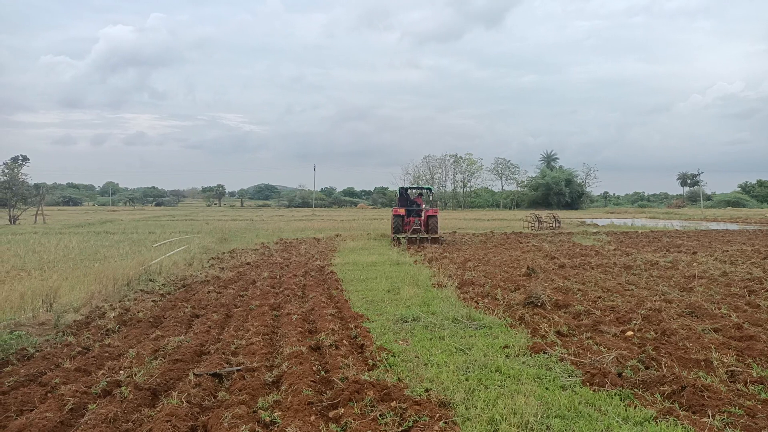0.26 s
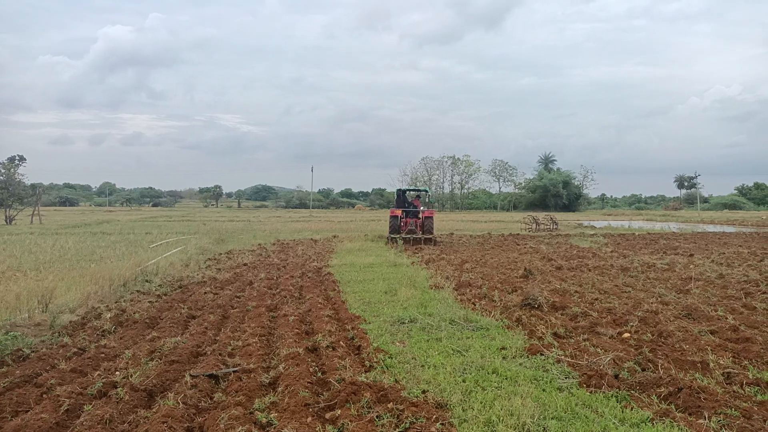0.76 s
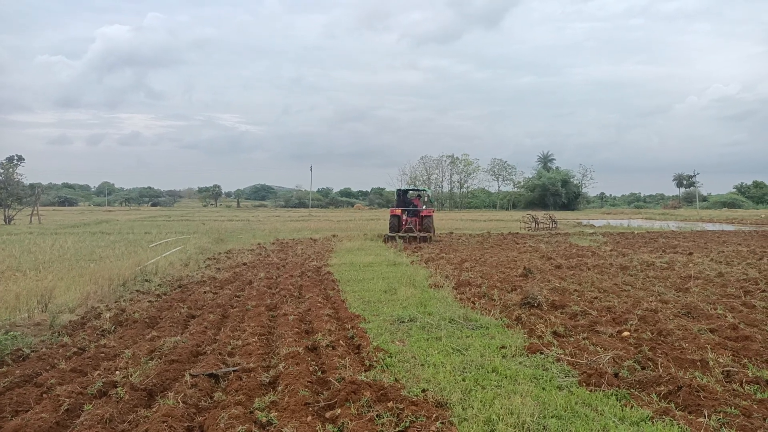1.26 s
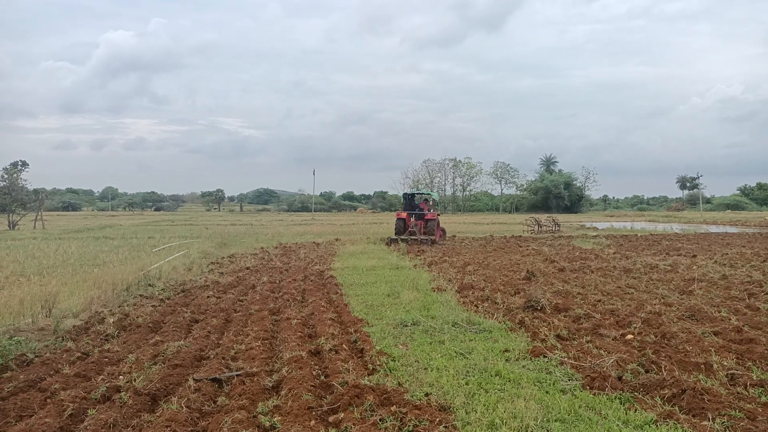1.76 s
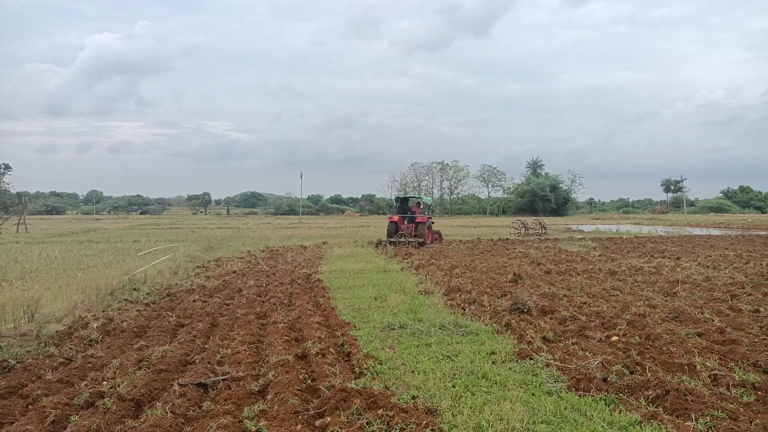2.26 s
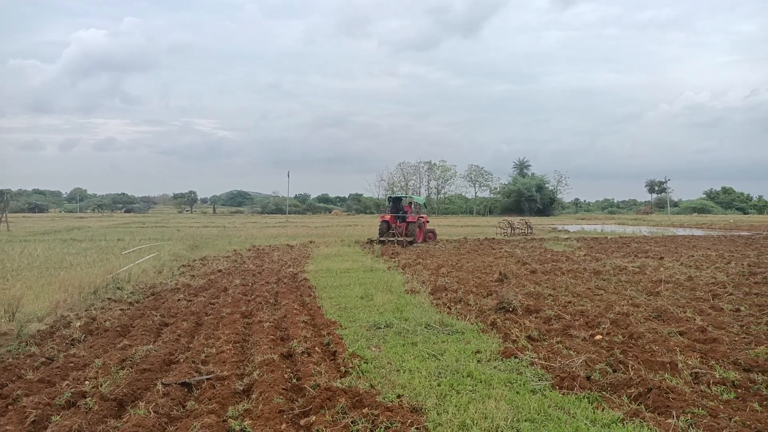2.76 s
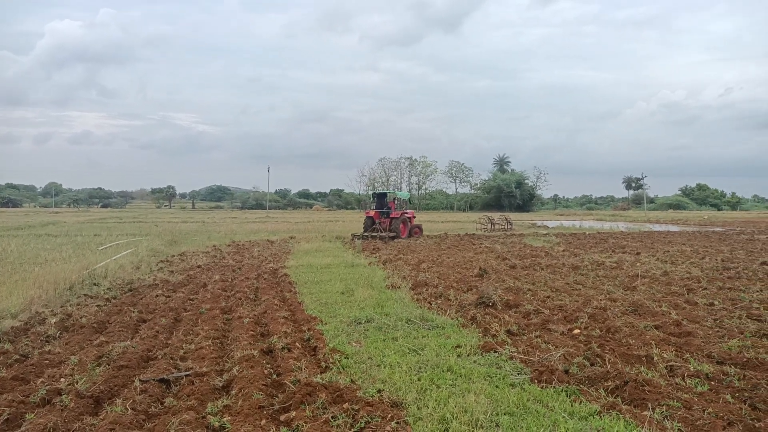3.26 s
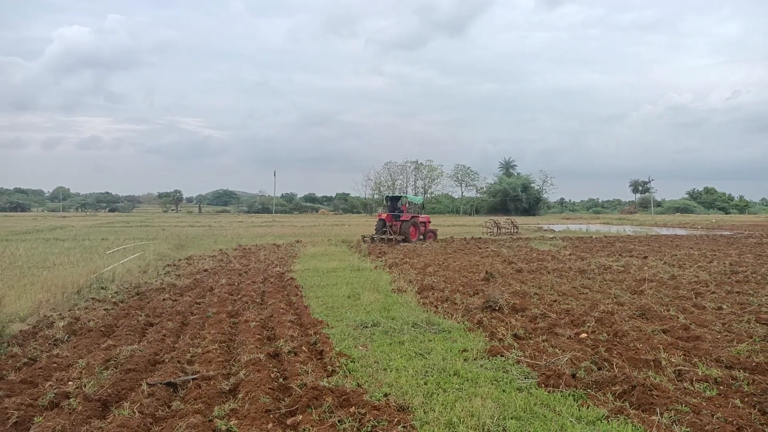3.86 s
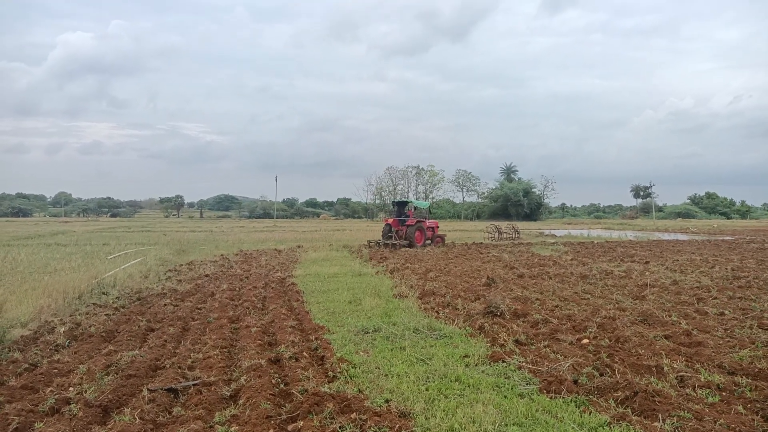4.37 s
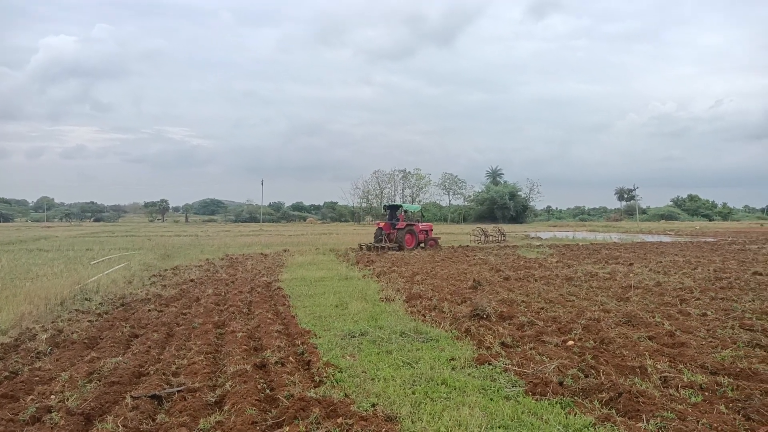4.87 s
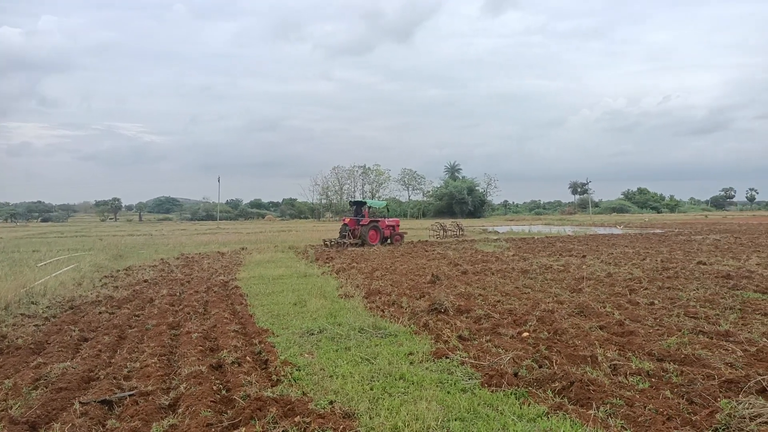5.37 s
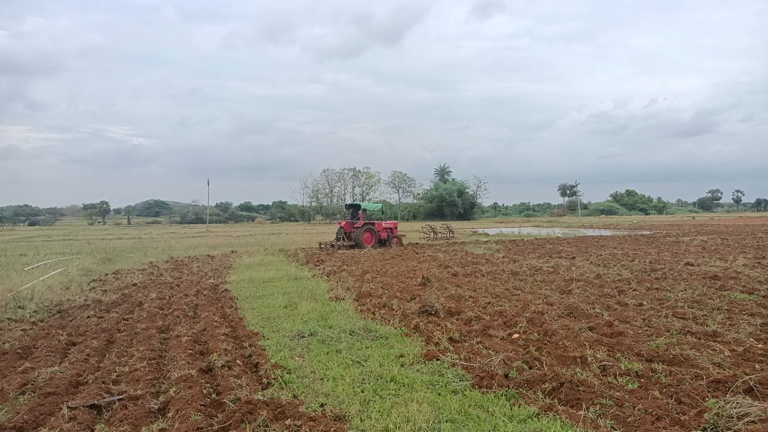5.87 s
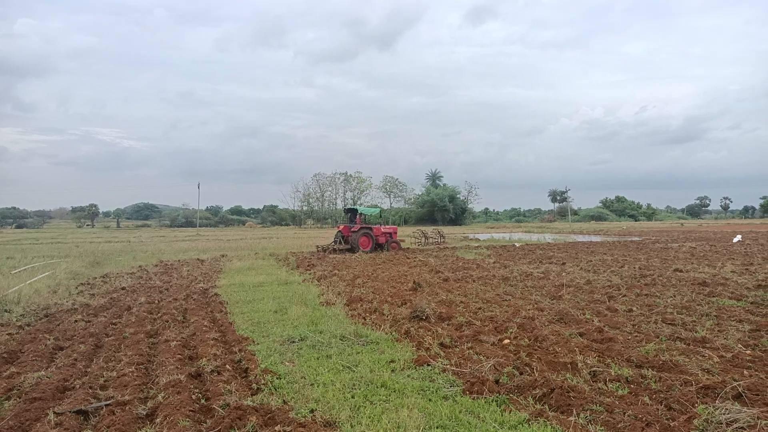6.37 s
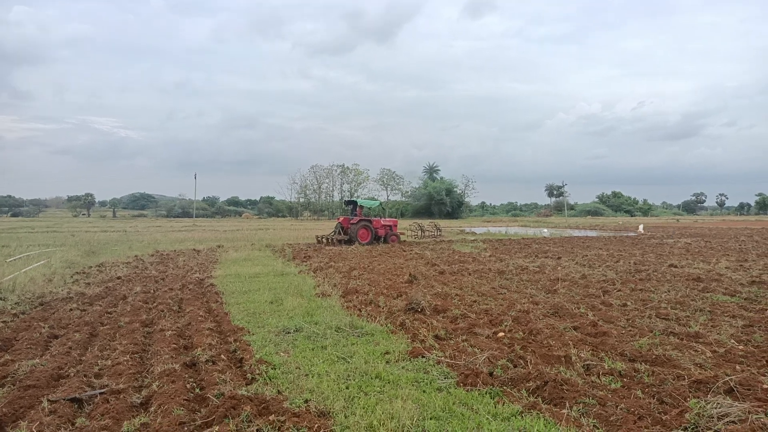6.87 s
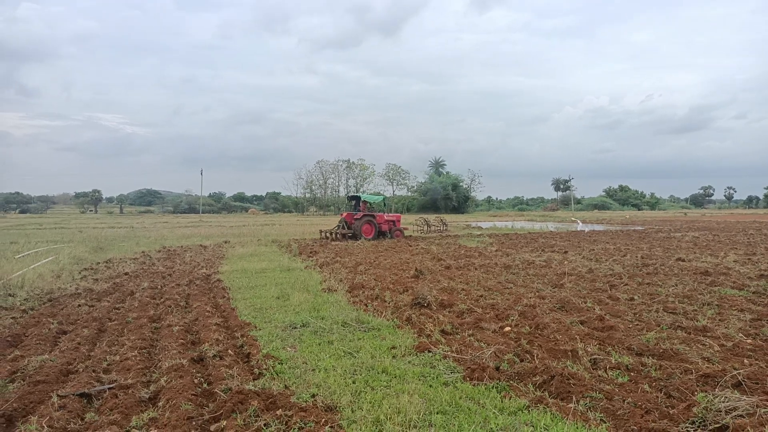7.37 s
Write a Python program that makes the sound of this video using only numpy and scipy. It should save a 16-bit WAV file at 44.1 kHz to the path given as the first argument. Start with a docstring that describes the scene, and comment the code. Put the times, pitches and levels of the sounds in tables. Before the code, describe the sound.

A diesel tractor runs, then slows to an uneven chug as wind gusts buffet the microphone, with faint birds behind.

```python
"""Tractor working a windy field

A diesel tractor drags a squeaking cultivator, then slows to a chug for the turn. Each firing is a
thump in the silencer, a bark and rasp in the exhaust stack and a spit of hiss. Gusts buffet the two
ports of the microphone, while birds chip and an insect buzzes from the grass."""
import sys
import numpy as np
from scipy import signal
from scipy.fft import rfft, irfft
from scipy.io import wavfile
from scipy.ndimage import map_coordinates

SR = 44100
rng = np.random.default_rng(int(sys.argv[2]) if len(sys.argv) > 2 else 0)


def master_out(mix):
    """Clip the mix to full scale and print it as 16-bit PCM to the path in sys.argv[1]."""
    frames = np.transpose(np.atleast_2d(mix))
    ceiling = np.clip(frames, -1, 1)
    pcm = np.round(ceiling * 32767).astype(np.int16)
    wavfile.write(sys.argv[1], SR, pcm)


N = 335601
T = np.arange(N) / SR
HZ = np.fft.rfftfreq(N, 1 / SR)

# how alike the two microphone ports sound: (frequency [Hz], likeness [capped at 1])
PORT_LIKENESS = [(60, 0.55), (300, 0.8), (600, 1), (1200, 0.86), (2200, .65), (4200, 1.6), (5600, 0.5),
                 (6600, 0.05), (9300, 0.9), (14000, 0.8)]
# phase between the ports: (frequency [Hz], left lead [rad])
PORT_PHASE = [(100, 0.39), (1500, 0.16), (2200, -1.02), (3100, -1), (4200, -1), (5800, -0.2), (7500, -3),
              (9000, -1.5), (10500, -1), (15000, -0.5)]
# balance of the ports: (frequency [Hz], left minus right [dB])
PORT_BALANCE = [(100, 1.5), (750, 0), (1000, 2), (1280, -2), (1550, 4), (1900, -0.5), (2800, 1),
                (3700, -3.5), (5500, -2.5), (7400, 6), (9500, -9), (11000, -9), (13000, -4)]
# the tractor's bearing: (time [s], left port delay [microseconds])
LEFT_DELAY = [(0, 47), (3.4, 33), (5.8, 3.5), (7.61, -12)]
# hush of the field: (frequency [Hz], relative level [dB])
FIELD_SPECTRUM = [(20, -27), (70, 5), (150, -3.5), (300, -26.5), (600, -16), (1300, -18), (3200, -20.5),
                  (5500, -35.5), (7000, -38.5), (9300, -40.5), (12000, -57), (16000, -54)]
# the nearest birds: (time [s], pitch [Hz], length [s], level [dB])
BIRD_CHIPS = [(3.85, 4050, .015, -53), (4.1, 4670, .01, -51), (5.427, 4250, .006, -37),
              (5.805, 4500, .014, -46), (5.874, 3950, .005, -43), (6.292, 3450, .005, -43),
              (6.382, 3800, .005, -44), (7.161, 3480, .005, -46), (7.396, 3460, .006, -46)]
# ringing partials of the cultivator: (time [s], pitch [Hz], length [s], level [dB])
SQUEAK_PARTIALS = [(.025, 9500, 0.02, -62.5), (.778, 9000, .022, -65), (3.597, 2770, 0.013, -46),
                   (3.6, 4560, 0.045, -62), (3.6, 5870, 0.027, -58), (3.598, 7420, 0.022, -69),
                   (3.965, 6800, 0.032, -66), (3.97, 9160, 0.042, -65)]
# wind on the microphone: (frequency [Hz], relative level [dB])
BUFFET_SPECTRUM = [(15, -50), (35, -27), (80, 2), (150, 0.5), (250, -3.5), (420, -11.5), (600, -27.5),
                   (800, -33), (2000, -59), (5000, -85)]
# hard gusts: (time [s], relative peak [dB], left minus right [dB], length [s])
HARD_GUSTS = [(0.679, -21, 7, 0.018), (0.799, -22, -13, 0.02), (0.888, -18, -17, 0.016),
              (1.112, -11.5, -20, 0.014), (2.723, -17.5, -30, 0.011), (2.803, -11.5, -27, 0.012),
              (2.938, -8.5, 8, 0.02), (3.057, -9.5, 7.5, 0.027), (3.135, -17.5, 25, 0.014),
              (3.203, -4, 31.5, 0.015), (3.222, -6.5, 26, 0.014), (3.282, -13, -6.0, 0.021),
              (3.322, -6.5, 17, 0.011), (3.403, -5, 26, 0.014), (3.695, -10, 43, 0.018),
              (3.876, -19, 22.5, 0.024), (4.182, -18.5, 19, 0.02), (5.13, -17.5, 30, 0.02),
              (5.241, -27, 21.0, 0.024), (7.255, -31.5, 20, 0.022), (7.53, -26.5, 26, 0.024),
              (7.563, -29, 14, 0.024)]
# spells of small eddies: (start [s], end [s], relative level [dB], left minus right [dB])
WINDY_SPELLS = [(.8, .92, -29.5, -7), (2.701, 3.15, -25.5, 3), (3.148, 3.48, -21.5, 17.5),
                (3.573, 3.68, -23.5, 11), (3.976, 4.22, -25, 24)]
# engine speed: (time [s], firing rate [Hz])
FIRING_RATE = [(0.0, 32.23), (0.2, 30.19), (0.39, 34.89), (0.66, 29.83), (1.09, 33.72), (1.41, 31.85),
               (1.66, 33.37), (1.98, 31.52), (2.94, 28.8), (3.33, 26.06), (3.73, 15.12), (4.17, 19.16),
               (5.26, 13.57), (5.99, 19.08), (6.35, 16.07), (6.54, 16.52), (6.79, 26.15), (7.32, 17.88),
               (7.61, 23.98)]
# the driver eases off the pedal: (time [s], length [s], depth [0-1])
PEDAL_LIFTS = [(0.078, 0.078, 0.53), (0.544, 0.12, 0.55), (6.797, 0.36, 0.8), (7.187, 0.22, 0.46),
               (7.576, .1, 1)]
# exhaust hiss, growing as the tractor comes side-on: (time [s], relative level [dB])
HISS_LEVEL = [(0, -75), (1.9, -72), (2.4, -63), (3.3, -64.5), (3.8, -70), (4.4, -69), (5.1, -66),
              (6.0, -56), (6.35, -63), (6.7, -59.5), (7.61, -68)]
# boom of the silencer: (frequency [Hz], width [Hz], gain [dB])
SILENCER_MODES = [(87, 36.9, 1), (99.5, 23.3, 2.5), (167.5, 19, -12)]
# resonances of the exhaust stack: (frequency [Hz], width [Hz], gain [dB])
STACK_MODES = [(460, 31, -47), (602, 58, 7), (1040, 149, 6.5), (1233, 37, 4.5), (1585, 340, 0),
               (2150, 80, 3.5), (2604, 166, -1), (3164, 87, 1), (3840, 170, -60), (4400, 130, -43),
               (5260, 130, -38)]
# low exhaust rumble: (frequency [Hz], relative level [dB])
RUMBLE_SPECTRUM = [(25, -47), (50, -8), (70, -15), (100, -7), (135, 4), (165, 0), (200, -14), (260, -16),
                   (450, -54.5)]
# clatter of the engine block: (frequency [Hz], relative level [dB])
CLATTER_SPECTRUM = [(100, -38), (200, -3), (330, -9.5), (500, 10.5), (720, 4), (880, -13), (1250, 1.5),
                    (1950, -9), (2700, -6), (3400, -13), (5000, -48), (7000, -32), (10000, -25.5),
                    (15000, -64)]
# exhaust hiss: (frequency [Hz], relative level [dB])
HISS_SPECTRUM = [(2500, -11.5), (4000, -1), (5400, -1.5), (6300, -11), (7300, -9.5), (8400, -2.5),
                 (9300, -0.5), (10400, -9), (12000, -17), (13500, -19.5), (15500, -16.5)]

WORKING_RATE_HZ, USUAL_HISS_DB = 30, -68


def amp(db):
    return 10 ** (np.asarray(db) / 20)


def unit_rms(x):
    return x / np.sqrt(np.mean(x ** 2) + 1e-20)


def low_pass(x, hz, order):
    return signal.sosfilt(signal.butter(order, hz, fs=SR, output="sos"), x)


def high_pass(x, hz, order):
    return signal.sosfilt(signal.butter(order, hz, "high", fs=SR, output="sos"), x)


def curve(points, times):
    return np.interp(times, *np.transpose(points))


def spectrum(points):
    """A smooth curve through a frequency table, one value per bin."""
    hz, value = np.transpose(points)
    return np.interp(np.log(HZ + 1), np.log(hz + 1), value)


def noise(points):
    """Noise coloured by a frequency table."""
    return unit_rms(irfft(rfft(rng.standard_normal(N)) * amp(spectrum(points)), N))


def drift(hz):
    """A random wobble of rms 1, up to the given rate."""
    return unit_rms(low_pass(rng.standard_normal(N), hz, order=2))


def ring(x, modes):
    """Passes x through parallel resonances."""
    response = sum(amp(db) / (1 + 1j * (HZ ** 2 - hz ** 2) / (width * HZ + 1e-9))
                   for hz, width, db in modes)
    return irfft(rfft(x) * response, N)


def echo(x, delay, share):
    """Adds one inverted reflection, as from the open end of a pipe."""
    return irfft(rfft(x) * (1 - share * np.exp(-2j * np.pi * HZ * delay)), N)


def bell(t, length):
    """A smooth swell, above half power for the given length."""
    return 2 ** (-2 * (t / length) ** 2)


def around(s, length):
    """The samples near a moment, and their times from it."""
    near = slice(max(int((s - 2 * length) * SR), 0), min(int((s + 2 * length) * SR), N))
    return near, T[near] - s


def whistles(rows, fall, waver, waver_hz):
    """Short tones that slide down and waver, both by a share of their pitch."""
    out, unrest = np.zeros(N), drift(waver_hz)
    for s, hz, length, db in rows:
        near, t = around(s, length)
        pitch = hz * (1 - fall * t / length + waver * unrest[near])
        out[near] += amp(db) * bell(t, length) * np.sqrt(2) * np.sin(2 * np.pi * np.cumsum(pitch) / SR)
    return out


def ports(mid, side):
    """Two microphone ports hear partly the same sound, shifted in phase and level."""
    likeness = np.clip(spectrum(PORT_LIKENESS), 0, 1)
    common = np.sqrt((1 + likeness) / 2) * rfft(mid)
    apart = np.sqrt((1 - likeness) / 2) * rfft(side)
    skew = np.exp(.5j * spectrum(PORT_PHASE)) * amp(spectrum(PORT_BALANCE) / 2)
    return irfft(np.array([(common + apart) * skew, (common - apart) / skew]), N)


def field():
    """A steady, low bed of open air."""
    return amp(-50) * ports(noise(FIELD_SPECTRUM), noise(FIELD_SPECTRUM))


def insect(lone_s=.73, run_s=3.47, gap_s=.285, gap_growth_s=.0076, buzz_s=.047, first_db=-71):
    """One thin buzz, then a run of them that slows and grows louder."""
    level, k = np.zeros(N), np.arange(13)
    run = zip(run_s + gap_s * k + gap_growth_s * k ** 2 / 2, first_db + 0.25 * k)
    for s, db in [(lone_s, first_db), *run]:
        near, t = around(s, buzz_s)
        level[near] += amp(db) * bell(t, buzz_s)
    wing = [(8500, 1300, 0)]
    return level * unit_rms(ring(ring(rng.standard_normal(N), wing), wing)) * amp([[-3], [0]])


def birds(gap_s=.085, low_hz=3400, high_hz=5000, far_s=.005, far_db=-54):
    """A few near chips over two loose bouts of distant twitter."""
    slots = np.concatenate([np.arange(5.55, 6.75, gap_s), np.arange(7.1, 7.5, gap_s)])
    far = [(s + late * gap_s, low_hz + (high_hz - low_hz) * pitch, far_s, far_db)
           for s, (late, pitch) in zip(slots, rng.random((len(slots), 2)))]
    return whistles(list(BIRD_CHIPS) + far, fall=.04, waver=.05, waver_hz=700) * amp([[-1.5], [0]])


def cultivator():
    """The implement squeaks in brief, almost steady partials."""
    return whistles(SQUEAK_PARTIALS, fall=0, waver=.005, waver_hz=400) * amp([[-2], [0]])


def eddies(per_s=26, length_s=0.022, spread_db=2.5, pan_spread_db=11):
    """Small eddies scattered through each windy spell, as rows like those of the gusts."""
    rows = []
    for start, end, db, pan_db in WINDY_SPELLS:
        chance = rng.standard_normal((64, 3))
        for s, (shift, size, swing) in zip(np.arange(start, end, 1 / per_s), chance):
            time = s + 0.2016 * shift / per_s
            rows.append((time, db + spread_db * size, pan_db + pan_spread_db * swing, length_s))
    return rows


def wind(gust_trim_db=-3.5, bluster_from_db=-25.5, bluster_range_db=9):
    """Eddies hit each port: a pressure swing inside churning air, dull when light, blustery when hard."""
    dull_core_s, sharp_core_s, coreless_s = 0.0013, 0.00065, 0.028
    out = np.zeros((2, N))
    rows = [(s, db + gust_trim_db, pan_db, length) for s, db, pan_db, length in HARD_GUSTS] + eddies()
    for side, sign in enumerate((1, -1)):
        hard = unit_rms(noise(BUFFET_SPECTRUM) * amp(2 * drift(90)))
        soft = unit_rms(low_pass(hard, 198, order=5))
        for s, db, pan_db, length in rows:
            near, t = around(s, 1.5 * length)
            port_db = db - 10 * np.log10(1 + amp(-sign * pan_db) ** 2)
            force = np.clip((port_db - bluster_from_db) / bluster_range_db, 0, 1)
            swell = np.exp(-1.5 * abs(t) / length)
            churn = unit_rms(swell * (force * hard[near] + (1 - force) * soft[near]))
            core_time = t / (dull_core_s + (sharp_core_s - dull_core_s) * force)
            core = unit_rms(-core_time * np.exp(-core_time ** 2 / 2))
            core_share = np.clip(1 - length / coreless_s, 0, 1)  # short eddies pop, long ones churn
            eddy = np.sqrt(core_share) * core + np.sqrt(1 - core_share) * churn
            out[side, near] += amp(port_db + 1.5) * eddy * np.sqrt(np.mean(swell ** 2))
    return high_pass(np.tanh(out), 34, order=2)  # the diaphragm rounds off the hardest swings


def gear_whine():
    """A faint, rough tone that follows the engine and is heard only at working speed."""
    rate = curve(FIRING_RATE, T)
    cycles = np.cumsum(14.5 * rate * (1 + .014 * drift(40))) / SR
    working = np.clip((rate - 28) / 4, 0, 1)
    return amp(-56 + 3.5 * drift(12)) * working * np.sin(2 * np.pi * cycles)


def firings():
    """Each firing's time, and a size that keeps the mean power independent of speed."""
    rate = curve(FIRING_RATE, T)
    at = np.flatnonzero(np.diff(np.floor(np.cumsum(rate) / SR + .5)) > 0)
    return T[at], np.sqrt(SR / rate[at])


def pedal_up(times, lift_s=0.0197, press_s=0.025):
    """How far the fuel is shut off, 0-1: it cuts quickly and returns more slowly."""
    lifts = [depth * np.clip(1 + np.minimum((times - s) / lift_s, (s + length - times) / press_s), 0, 1)
             for s, length, depth in PEDAL_LIFTS]
    return np.max(lifts, axis=0)


def firing_levels(times, speed):
    """Thump, rasp and hiss in dB: the first two rise with speed, and all duck when the pedal lifts."""
    octaves, lift = np.log2(speed), pedal_up(times)
    hiss_db = curve(HISS_LEVEL, times)
    side_on_db = hiss_db - USUAL_HISS_DB
    thump_db = -35.5 + 11.8 * octaves - 19.3 * lift ** 1.7 + 0.1 * side_on_db
    rasp_db = -49.5 + 4.4 * octaves - 26 * lift ** 3 + 0.21 * side_on_db
    return thump_db, rasp_db, hiss_db - 32 * lift


def clicks(times, sizes, lead):
    """A train of clicks, lead seconds ahead of the firings."""
    train = np.zeros(N)
    train[np.clip(np.round((times - lead) * SR).astype(int), 0, N - 1)] = sizes
    return train


def puffs(times, sizes, lead, rise, decay, tail_db, tail):
    """Envelope of gas leaving the stack: a fast puff and a weaker, slower tail, timed in seconds."""
    t = T[:SR // 5]
    attack = 1 - np.exp(-(t / rise) ** 2)
    power = attack * (np.exp(-t / decay) + amp(tail_db) ** 2 * np.exp(-t / tail))
    return np.sqrt(abs(signal.oaconvolve(clicks(times, sizes ** 2, lead), power / power.sum())[:N]))


def pipe(train, modes, low_hz, high_hz):
    """Pressure pulses ring a pipe, which radiates little outside the band of its modes."""
    ringing = ring(signal.unit_impulse(N), modes)
    response = low_pass(high_pass(ringing, low_hz, order=3), high_hz, order=3)[:SR // 4]
    return signal.oaconvolve(train, response / np.linalg.norm(response))[:N]


def silencer(train):
    """Rounded pressure pulses ring the silencer; neighbouring modes swing in opposite senses."""
    pre_roll = SR // 50
    click = signal.unit_impulse(N, pre_roll)
    ringing = sum((-1) ** (k + 1) * ring(click, [mode]) for k, mode in enumerate(SILENCER_MODES))
    bass_band = np.exp(-(HZ / 185) ** 2) * (1 - np.exp(-(HZ / 42) ** 4))
    rounded = irfft(rfft(ringing) * bass_band, N)
    response = high_pass(echo(rounded, delay=.0114, share=.67), 45, order=2)[:SR // 4]
    return signal.oaconvolve(train, response / np.linalg.norm(response))[pre_roll:][:N]


def turbulence(times, rumble, rasp, clatter, hiss):
    """Four noises pulse with the firings; yields a mid layer, then a side layer."""
    rumble_gate = puffs(times, rumble, lead=-.003, rise=.0094, decay=.017, tail_db=-7, tail=.05)
    rasp_gate = puffs(times, rasp, lead=.0057, rise=.0061, decay=.0098, tail_db=-13.5, tail=.019)
    clatter_gate = puffs(times, clatter, lead=.0082, rise=.003, decay=.0097, tail_db=-10.5, tail=.039)
    hiss_gate = puffs(times, hiss, lead=.0054, rise=.0064, decay=.0027, tail_db=-29, tail=.014)
    lumps = amp(2.13 * drift(144))  # the gas leaves in ragged lumps
    for _ in range(2):
        stack = ring(rng.standard_normal(N), STACK_MODES)
        stack = unit_rms(low_pass(high_pass(stack, 527, order=6), 5000, order=6))
        grit = amp(0.5) * rasp_gate * stack + amp(3) * clatter_gate * noise(CLATTER_SPECTRUM)
        body = amp(-7) * rumble_gate * noise(RUMBLE_SPECTRUM)
        spit = amp(6) * hiss_gate * noise(HISS_SPECTRUM)
        yield body + echo(lumps * grit, delay=.00203, share=.42) + spit


def bearing(pair):
    """The left port hears the tractor late until it comes round to the left."""
    late_s = curve(LEFT_DELAY, T) * 1e-6
    left = map_coordinates(pair[0], [(T - late_s) * SR], order=5, mode="nearest")
    return np.array([left, pair[1]])


def tractor():
    """Every firing thumps, barks, rasps and hisses; the block clatters more at speed."""
    times, sizes = firings()
    speed = curve(FIRING_RATE, times) / WORKING_RATE_HZ
    thump, rasp, hiss = (sizes * amp(db) for db in firing_levels(times, speed))
    # weak and strong firings alternate, and no two burn alike; the thump is the steadiest part
    beat = np.resize([-1, 1], len(times))
    chance = rng.standard_normal((len(times), 5)).T
    thump *= amp(0.4 * chance[0])
    rasp *= amp(0.64 * beat + 1.51 * chance[1])
    hiss *= amp(1.26 * beat + 0.69 * chance[1])
    boom = amp(-1.5) * silencer(clicks(times + .0004 * chance[4], thump, lead=.0018))
    # slow firings leave a hollow ring in the silencer
    chugs = clicks(times, thump / speed ** 1.9, lead=-.00795)
    hollow = amp(-13.5) * pipe(chugs, [(135.7, 12.5, 0)], low_hz=87, high_hz=178)
    knock_db = 2 * beat + 2 * chance[3] - 30 * pedal_up(times)
    knocks = clicks(times + .00037 * chance[2], rasp * amp(knock_db), lead=.007)
    bark = amp(-6) * pipe(knocks, [(668, 56, 7), (1280, 110, -10.5)], low_hz=543, high_hz=1360)
    rumble = thump / np.sqrt(speed)
    clatter = rasp * speed * (hiss / sizes / amp(USUAL_HISS_DB)) ** 0.063  # rides slightly on the hiss
    mid, side = turbulence(times, rumble, rasp, clatter, hiss)
    return bearing(ports(boom + hollow + bark + gear_whine() + mid, side))


def scene():
    """Tractor, wind and small voices over the hush of the field."""
    return cultivator() + field() + tractor() + wind() + birds() + insect()


def record(dry):
    """Clips any peak beyond full scale and cuts the very top of the treble."""
    treble_cut = signal.firwin(511, 15850, window=("kaiser", 9), fs=SR)
    return signal.oaconvolve(np.clip(dry, -1, 1), treble_cut[None], "same")


dry = scene()
out = record(dry)
master_out(out)
```